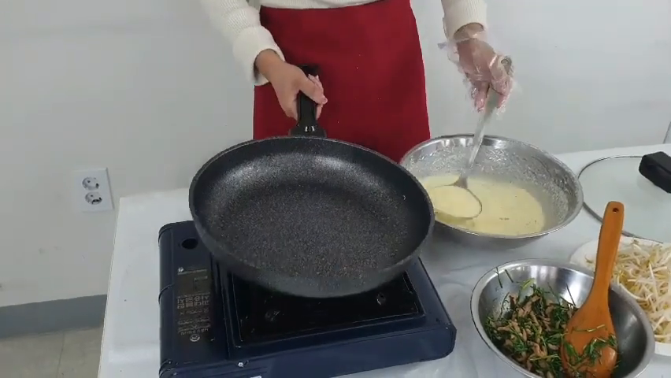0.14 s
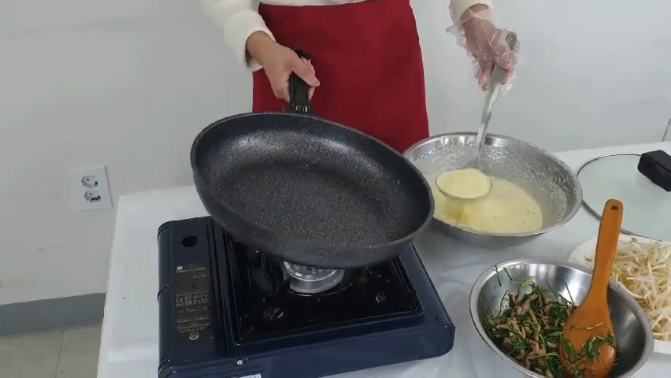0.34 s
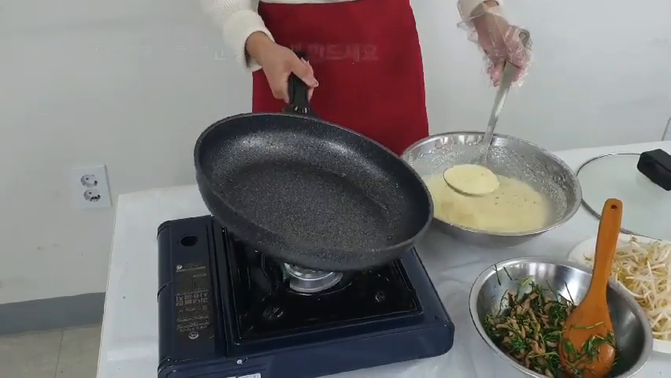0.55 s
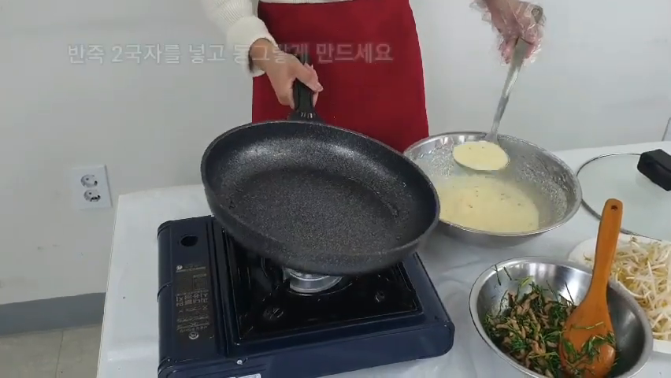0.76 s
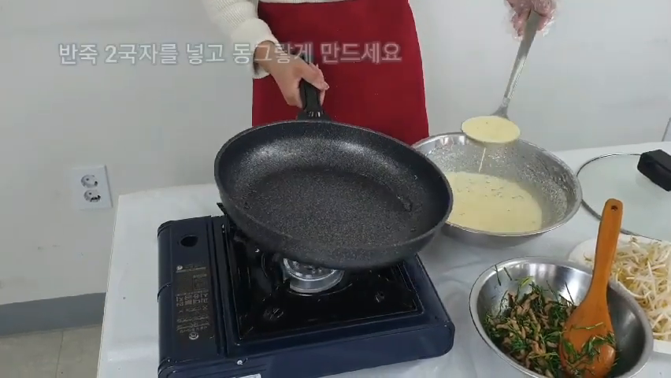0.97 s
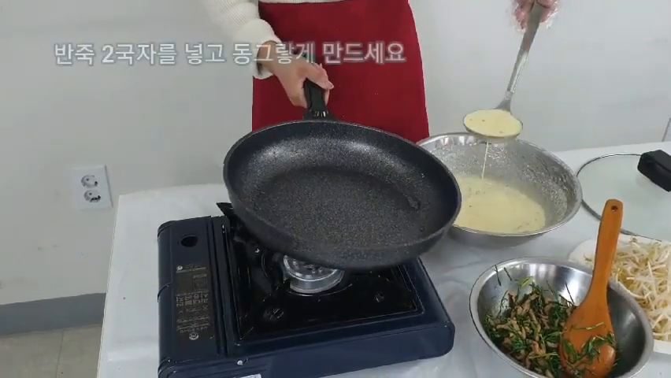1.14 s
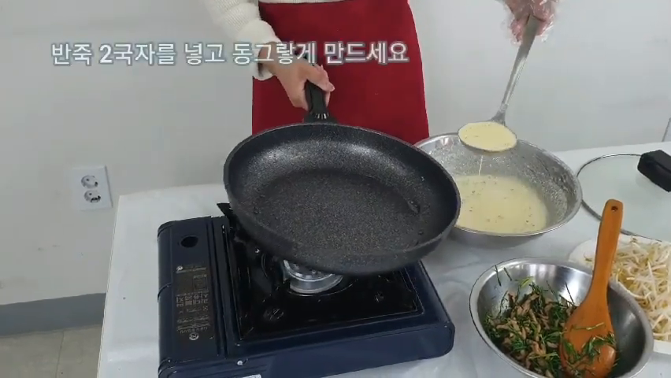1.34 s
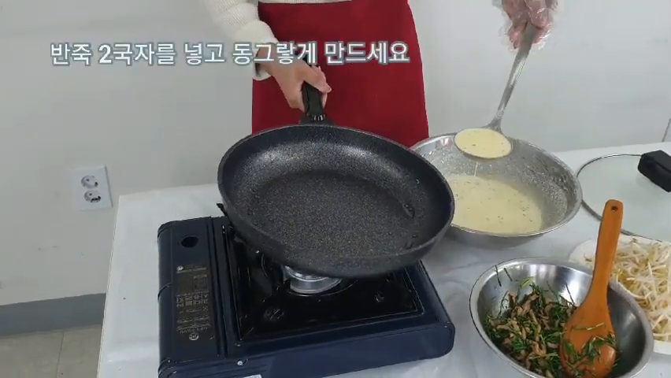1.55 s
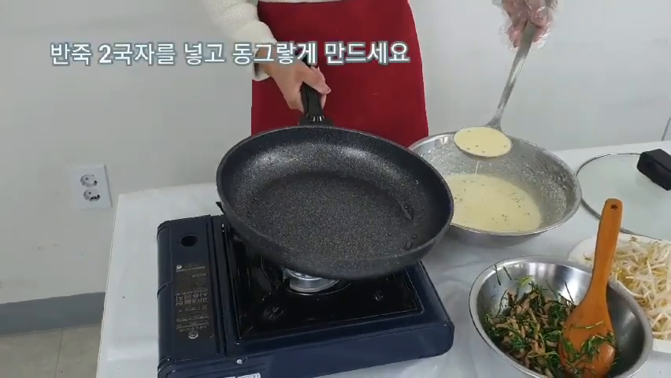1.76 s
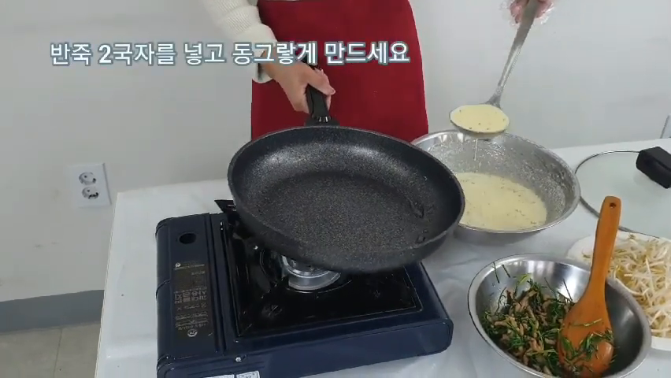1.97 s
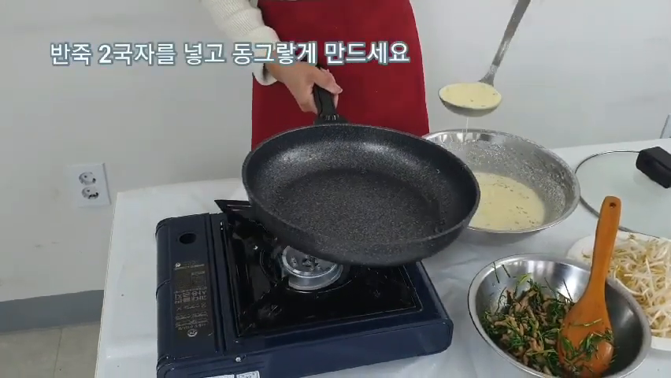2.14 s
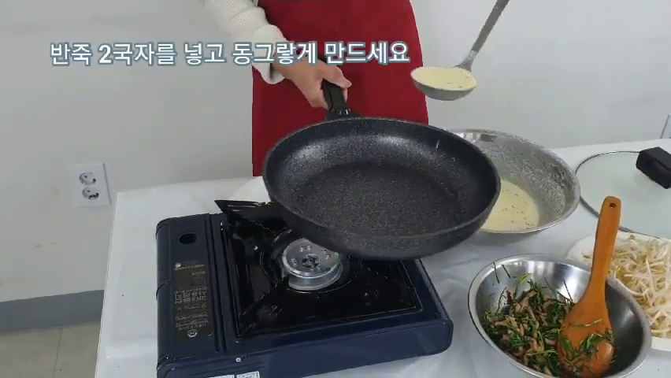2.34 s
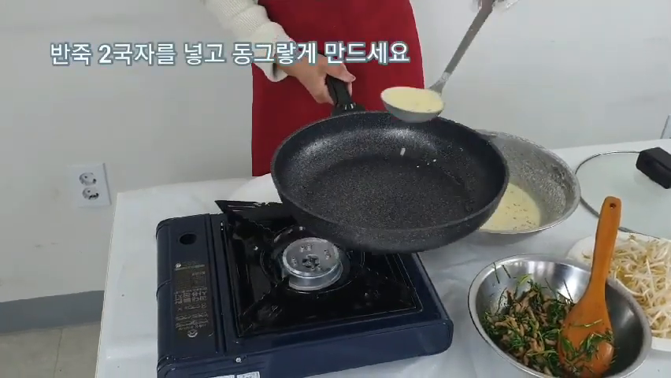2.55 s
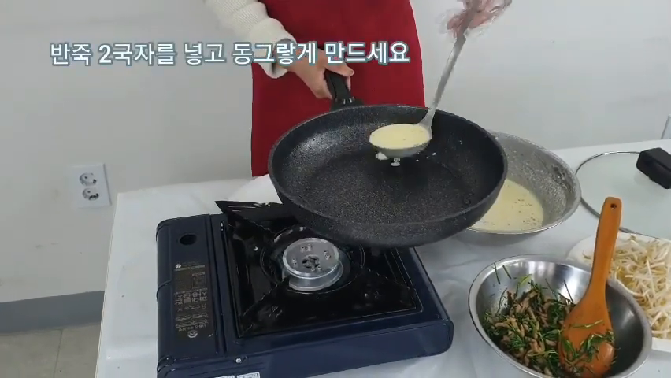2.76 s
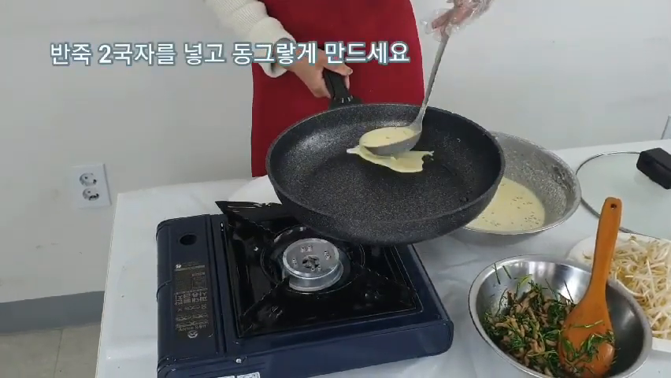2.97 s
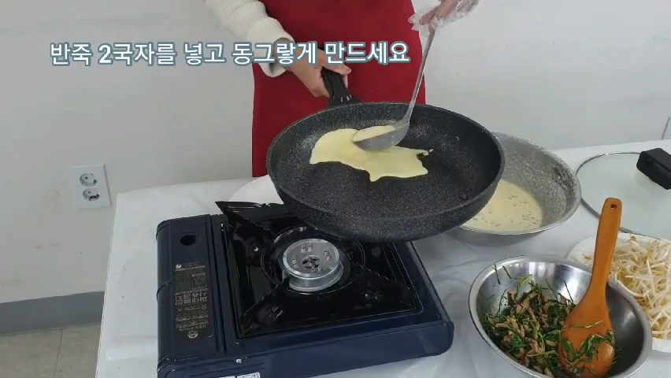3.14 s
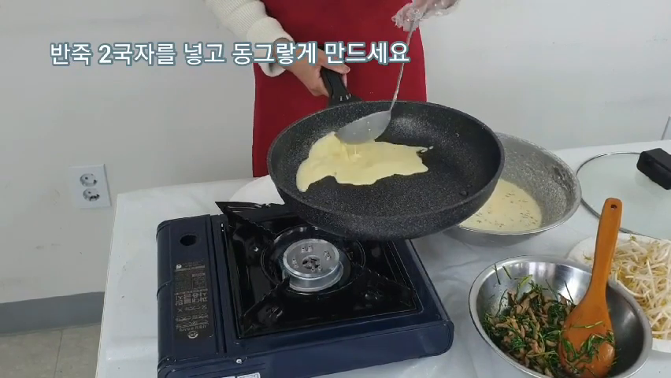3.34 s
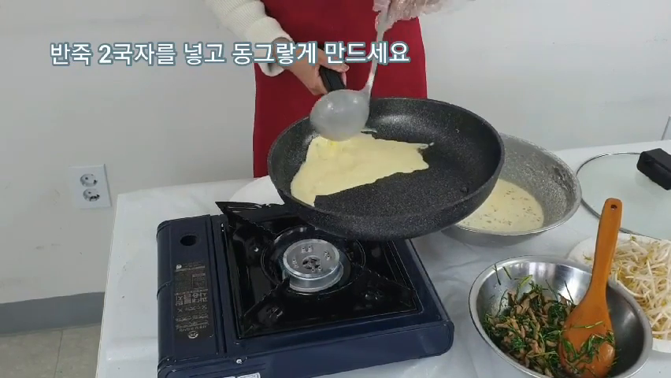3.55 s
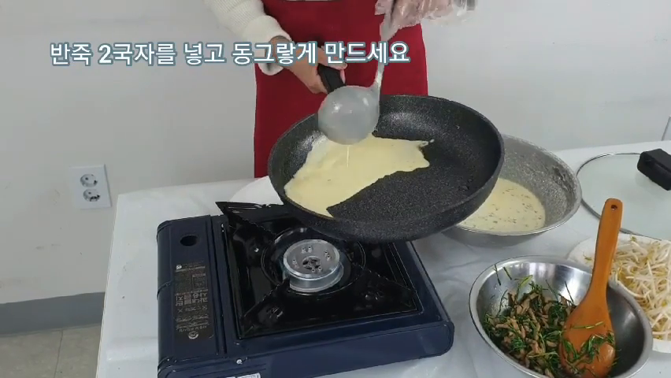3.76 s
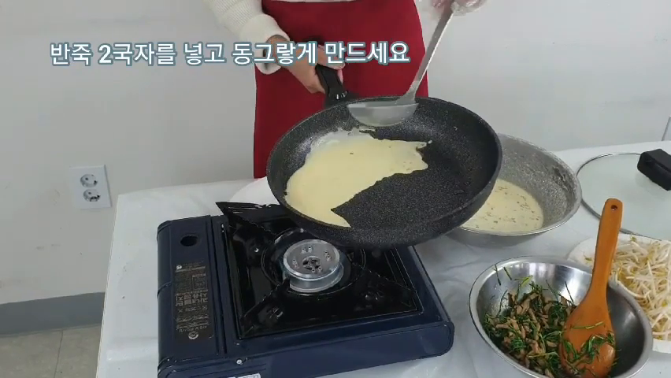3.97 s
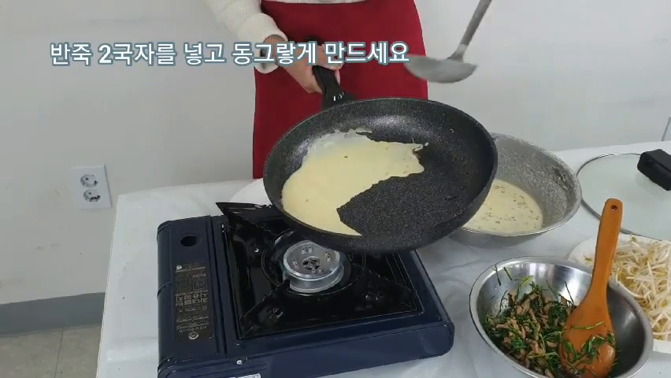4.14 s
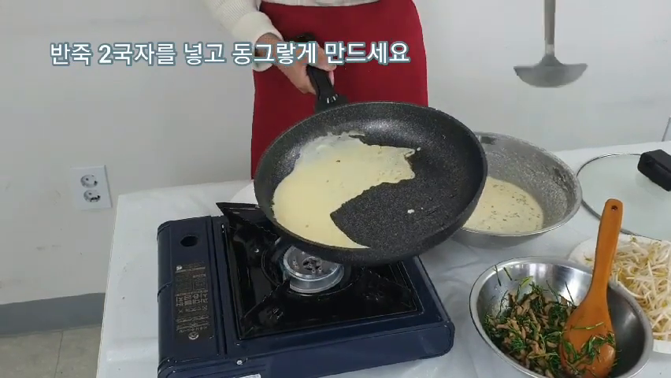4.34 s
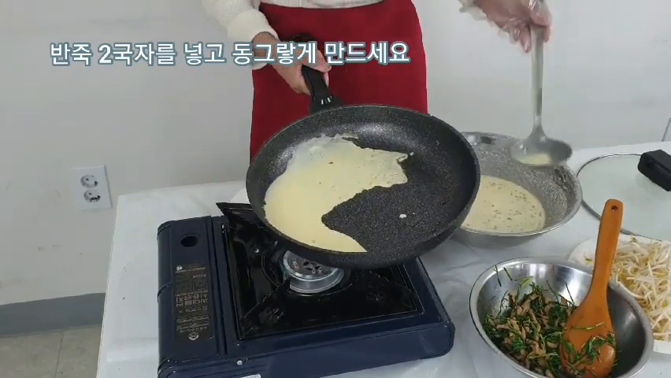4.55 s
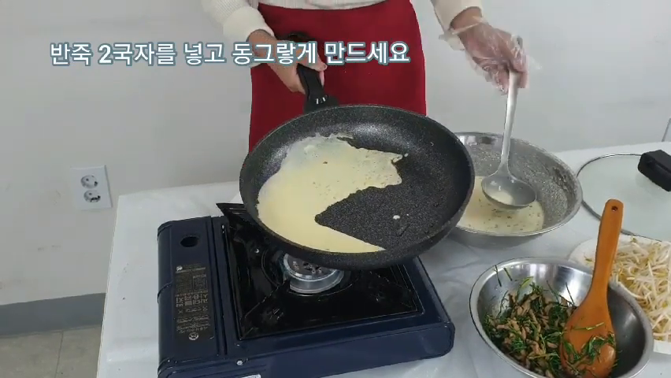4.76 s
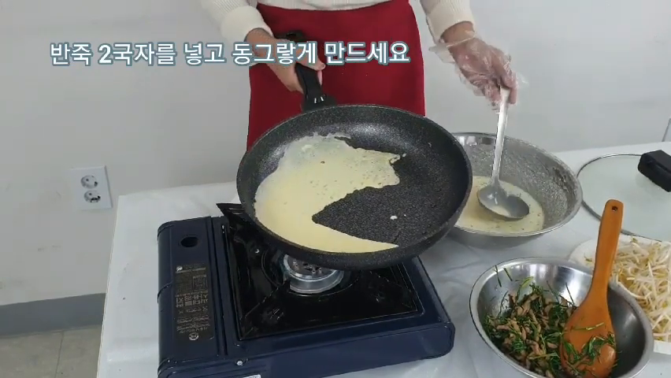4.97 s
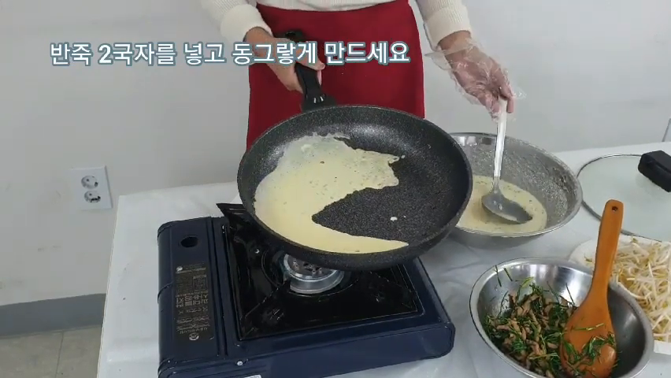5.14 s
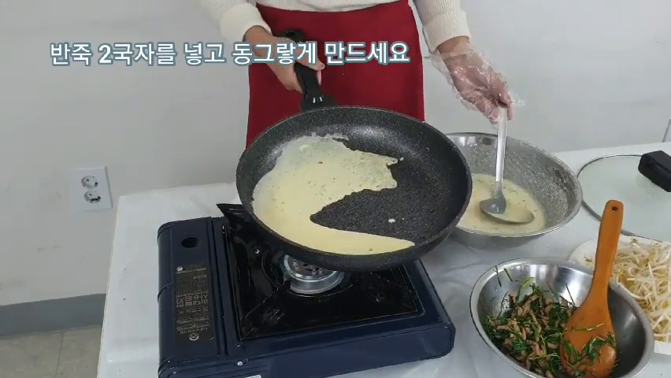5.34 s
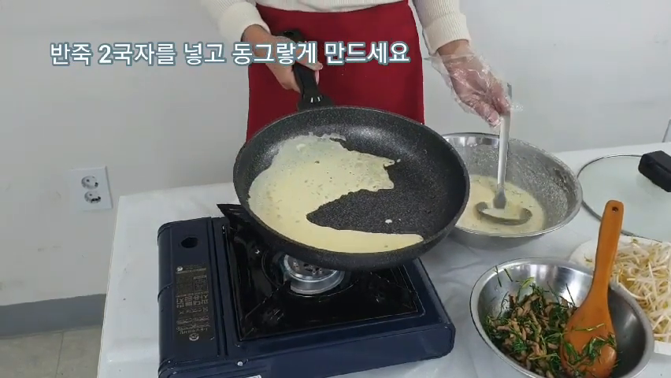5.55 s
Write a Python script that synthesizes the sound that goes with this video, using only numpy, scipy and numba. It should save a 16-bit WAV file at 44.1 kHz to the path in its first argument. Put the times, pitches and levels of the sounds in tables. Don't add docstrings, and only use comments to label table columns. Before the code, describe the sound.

A low motor hum, drops and a thin trickle into a steel bowl, dull table bumps, then batter sizzling in a hot pan and a final ladle knock.

```python
import sys
import numpy as np
from scipy import signal
from scipy.io import wavfile
from scipy.ndimage import uniform_filter1d
from numba import njit

SR = 44100
rng = np.random.default_rng(int(sys.argv[2]) if len(sys.argv) > 2 else 0)


def to_wav(sig):
    pcm = np.clip(np.atleast_2d(sig), -1, 1) * 32767
    pcm = np.round(pcm).astype(np.int16)
    wavfile.write(sys.argv[1], SR, pcm.T)


def volts_from_db(level):
    exponent = np.asarray(level, float) / 20
    return 10 ** exponent


N = 246903

# (time [s], level [dB])
HUM = [(0.0, -42.5), (0.73, -43), (0.84, -49), (0.92, -42.5), (2.03, -43.5), (2.09, -38.5), (2.35, -47.5),
       (2.4, -40.5), (2.79, -46), (3.04, -37), (3.16, -41.5), (3.34, -40.5), (4.66, -42.5), (4.73, -43.5),
       (5.57, -42), (5.6, -51)]
MOTOR_HZ = 59.03
LINES_DB = (-4.5, -2)
WAVER_DB, WAVER_RATE, THIRD_DB = 1.5, 9.6, -20.5
# (pitch [Hz], density [dB per Hz])
AIR = [(20, -9), (35, -24), (50, -6.5), (70, -13), (95, -8.5), (150, -14.5), (200, -13), (360, -20.5),
       (450, -18), (520, -22), (720, -26), (1400, -30), (3500, -35.5), (15500, -39.5)]
AIR_DB, AIR_FOLLOWS = -50, 0.69
# (time [s], lift [dB])
AIR_STIRS = [
    (0.0, 5),
    (2.15, 0.35),
    (2.75, 3.6),
    (3.85, 6.2),
    (4.15, 5.1),
    (4.5, 4.3),
    (5.3, 1.5),
]
AIR_STIR_S = 0.13
# (time [s], lift [dB])
TREBLE_STIRS = [
    (0.25, -1.5),
    (0.75, -0.5),
    (2.25, -3.5),
]
TREBLE_STIR_S = 0.2
# (pitch [Hz], likeness [0-1])
LIKENESS = [(40, 0.8), (130, 1), (290, 0.85), (640, 0.62), (1400, 0.45), (3100, 0.27), (6800, 0.0),
            (11000, 0.0), (15000, 0.4)]
# (pitch [Hz], likeness [0-1])
HISS_ALIKE = [(9000, 0.02), (11500, 0), (13000, 0.3), (15500, 0.6)]
# (time [s], peak [dB], centre [Hz], fade [s], left minus right [dB])
RUSTLES = [
    (0, -47.5, 2450, 0.29, 0),
    (0.171, -51, 1400, 0.32, 1),
    (0.529, -50, 1800, 1, 0),
    (0.541, -54, 8000, 0.87, 1),
    (2.076, -38.5, 170, 0.37, 1),
    (2.171, -48, 170, 0.22, -2),
    (2.601, -47.5, 1170, 0.81, 0),
    (5.249, -34.5, 453, 0.53, 0),
]
# (time [s], level [dB])
FADING = [
    (0.018, -43),
]
# (pitch [Hz], width [Hz], level [dB])
KNOCK_MODES = [(249, 25, -4.0), (355, 38, -11), (480, 49, -27), (786, 330, -24.5)]
# (time [s], peak [dB], pitch [Hz], left minus right [dB])
DROPS = [(0.056, -46, 1490, 1), (0.3304, -46, 3020, -4), (0.408, -56, 3140, -7), (0.3994, -60, 1380, -7),
         (1.066, -45, 3600, -3), (1.108, -46, 1630, -7), (1.1287, -44.5, 3370, 3), (1.169, -45, 1720, 2),
         (1.172, -44, 3000, 2), (1.1986, -53, 2800, 3), (1.22, -52, 2800, 2), (1.2396, -42, 2170, 5),
         (1.3144, -40, 2080, -4), (1.352, -37.5, 1700, -2), (1.35, -48, 2750, 0), (1.45, -48, 1950, 0),
         (1.567, -41, 1780, -2), (1.565, -42, 2400, -2), (1.605, -42, 2450, 0.0), (1.611, -47, 3000, 3),
         (1.635, -42, 2340, -1), (1.655, -47, 1650, -2), (1.671, -51, 2480, -1), (1.769, -42, 2520, -5),
         (1.765, -44, 1700, -2), (1.809, -44, 1710, 1), (2.707, -34, 4600, 0), (2.757, -57, 2420, 0.0),
         (2.797, -48, 2450, 7), (2.9594, -40, 2090, 4), (2.998, -25, 4600, 4), (3.0196, -22, 2360, 0),
         (3.0502, -30, 2300, 8)]
DROP_RING_S, PAN_RING_S, POUR_S = 0.19, 0.084, 2.9
# (time [s], peak [dB], pitch [Hz], left minus right [dB])
SPITS = [(1.066, -43, 12500, -8), (1.2305, -37, 5130, -2), (1.277, -41, 9230, -11), (1.3585, -37, 6260, -6),
         (1.429, -42, 7000, -11), (1.66, -38, 13700, -5), (2.5147, -57, 6330, -30), (2.84, -36.5, 7670, -8),
         (3.0524, -51, 7520, -0.5), (3.4614, -24, 11000, -12), (5.2399, -32, 7520, 0),
         (4.571, -26, 12400, -11), (5.429, -27, 14400, -1)]
SPIT_S, PAN_SPIT_S = 0.0094, 0.0049
# (time [s], level [dB])
TRICKLE = [
    (1.066, -57),
    (1.16, -63),
    (1.231, -51.5),
    (1.277, -55.5),
    (1.35, -52),
    (1.43, -55.5),
    (1.57, -55),
    (1.6, -52.5),
    (1.659, -53.5),
    (1.77, -55.5),
]
SPURT_RISE = 4000
SPURT_FALL = (91, 64, 46.7, 51.4)
TRICKLE_SIZES_DB = (-1.3, 1, -0.79, -1)
TRICKLE_LARGEST_HZ = 250
SIZE_HZ = (10000, 4400, 1800, 800)
# (pitch [Hz], level [dB])
BUBBLES = [(300, -4.5), (600, -2.5), (1100, -3), (2000, 0.5), (3000, -1), (4500, -2), (7000, 0.5),
           (10000, -1), (13000, 1.5), (15500, 3)]
# (time [s], peak [dB])
BOWL_RING = [(1.16, -52), (1.225, -53), (1.247, -48), (1.285, -48), (1.32, -51), (1.347, -37), (1.378, -43),
             (1.41, -49), (1.455, -47), (1.52, -53), (1.56, -54)]
BOWL_RISE, BOWL_FALL = 1600, 260
# (pitch [Hz], width [Hz], level [dB])
BOWL_MODES = [(1048, 38, 2), (926, 66, -7), (1720, 100, -13)]
# (time [s], peak [dB], pitch [Hz], ring [s])
BUMPS = [
    (2.082, -22.5, 76.4, 0.21),
    (2.138, -30, 81.5, .1),
    (2.173, -27, 91.5, 0.079),
    (2.206, -19, 68, 0.048),
]
# (time [s], level [dB], largest bubbles [octaves under LARGEST_TOP_HZ],
# coarseness [dB per octave down])
SIZZLE = [(2.4, -78, .4, -2), (2.52, -53.5, 0.36, -1), (2.64, -51.5, 0.33, -2), (2.66, -43, 0.11, -1.5),
          (2.74, -44, 2.6, -2), (2.83, -47.5, 0.54, -0.5), (2.85, -38.5, 0.48, -0.6),
          (2.92, -34, 1.08, 0.7), (3.04, -34.5, 1.45, 1.9), (3.21, -36, 2.12, 0.5),
          (3.31, -34.5, 2.3, -0.3), (3.47, -35, 2.1, -0.1), (3.55, -37.5, 2.18, 0.54),
          (3.9, -37.5, 2.43, -0.23), (4.15, -39, 2.26, 0.23), (4.6, -41.5, 2.82, 0.62),
          (5.02, -42, 3.38, 0.67), (5.6, -45.5, 3.6, 1.04)]
LARGEST_TOP_HZ = 4000
FRY_SIZES_DB = (-1, -1.5, -4.5, -7.5)
LEAK_DB = -20.5
# (time [s], lift [dB])
FLARES = [(2.71, 3), (3.17, 0.5), (3.3, 2.5), (3.4, 0.5), (3.85, 3), (4.21, 3.5), (4.33, 1), (4.57, 1.5),
          (5.05, 3), (5.2, 4), (5.432, 3.5), (5.575, 7.5)]
FLARE_HZ, FLARE_S = 3000, 0.02
SPATTER_RATE, SPATTER_DB, SPATTER_HZ = 260, 11, 12500
CRACKLE_RATE, CRACKLE_DB, CRACKLE_HZ = 110, 9, 5500
# (start [s], end [s], first pitch [Hz], last pitch [Hz], level [dB])
WHISTLE = [
    (2.7, 2.743, 1660, 1660, -53),
    (2.748, 2.805, 1665, 1750, -58),
    (2.705, 2.727, 2450, 2450, -59),
    (2.75, 2.84, 2470, 2475, -51.5),
    (2.873, 2.954, 2300, 2340, -48),
    (2.9, 2.95, 1575, 1570, -46),
]
# (time [s], peak [dB])
PAN_HUM = [
    (3.134, -57),
    (3.272, -50),
    (3.4, -54),
    (3.602, -51),
    (3.758, -53),
    (3.9, -50),
]
PAN_HZ = 424
# (time [s], peak [dB], pitch [Hz], ring [s])
LADLE_NOTES = [
    (8.1, -38, 830, .08),
    (4.4, -34, 640, .1),
    (5.565, -29, 531, 0.32),
    (5.572, -36.5, 173, .5),
    (4.2, -38, 1590, .15),
]
# (time [s], level [dB])
STIR = [
    (5.39, -44),
    (5.44, -45),
    (5.49, -47),
]
# (start, end [s])
STIR_HZ = (203, 293)
STIR_CLIMB_S = (5.455, 5.5)
# (time [s], level [dB])
LADLE = [
    (5.561, -33),
    (5.574, -30),
    (5.583, -36),
    (5.594, -35),
]
# (pitch [Hz], width [Hz], level [dB])
LADLE_MODES = [(188, 93, -9), (402, 66, -11.5), (600, 100, -12.5), (750, 270, -14.5), (1270, 100, -20),
               (1600, 210, -17.5), (2170, 300, -31)]
ROOM_T60_S, ROOM_DAMP, ROOM_DB = .35, .3, -13
PATCH_DB, PATCH_HZ, PATCH_S = 1.8, 180, 0.05
HOLE_DB, HOLE_FROM, PATCH_FULL_HZ = 16, 1.35, 2000
TOP_HZ = 15500


def curve(table):
    s, first, *rest = np.transpose(table)
    t = np.arange(N) / SR
    return [np.interp(t, s, first, left=-120, right=-120)] + [np.interp(t, s, c) for c in rest]


def across(table, hz):
    points = np.array(table)
    return np.interp(np.log(hz), np.log(points[:, 0]), points[:, 1])


def unit(x):
    return x / np.sqrt(np.mean(x ** 2))


def lean(db):
    return volts_from_db(np.array([[db], [-db]]) / 2)


@njit
def svf(x, hz, width):
    y, b, l = np.empty(len(x)), 0., 0.
    turn = 2 * np.pi * hz / SR
    g, k = np.tan(turn / 2), width / hz * turn / np.sin(turn)
    for i in range(len(x)):
        v = (b + g * (x[i] - l)) / (1 + g * (g + k))
        b, l, y[i] = 2 * v - b, l + 2 * g * v, k * v
    return y


def walk(rate):
    k = int(SR / rate)
    held = np.repeat(rng.standard_normal(N // 200 + 1), k)[:N]
    return 1.17 * uniform_filter1d(uniform_filter1d(held, k), k)


def noise():
    return rng.standard_normal(N)


def pair(source, hz, width, alike=None):
    alike = np.clip(across(alike or LIKENESS, hz), 0, .99)
    mid, side = (unit(svf(svf(source(), hz, width), hz, width)) for _ in range(2))
    return np.sqrt((1 + alike) / 2) * mid + np.sqrt((1 - alike) / 2) * side * np.array([[1], [-1]])


def ringing(modes):
    return unit(sum(volts_from_db(db) * np.sqrt(w) * pair(noise, 1. * f, 1.45 * w) for f, w, db in modes))


def swells(rows, rise, fall):
    t, power = np.arange(N) / SR, 0
    for s, db in rows:
        below = np.maximum(abs(rise) * (s - t), abs(fall) * (t - s))
        power = power + volts_from_db(np.maximum(db - below, -140)) ** 2
    return np.sqrt(power)


def humps(rows, width_s):
    t = np.arange(N) / SR
    return sum(db * np.exp(-((t - s) / width_s) ** 2) for s, db in rows)


def ping(s, db, hz, ring_s, pan_db, rough=0., rise_s=.001):
    out, first = np.zeros((2, N)), int(s * SR)
    t = np.arange(min(SR // 2, N - first)) / SR
    body = np.sin(2 * np.pi * hz * t)
    if rough:
        chance = rng.standard_normal((2, SR // 2))[:, :len(t)]
        puff = [svf(svf(c, 1. * hz, rough * hz), 1. * hz, rough * hz) for c in chance]
        body = 0.53 * unit(np.array(puff))
    out[:, first:first + len(t)] = np.clip(t / rise_s, 0, 1) * volts_from_db(-60 * t / ring_s) * body
    return volts_from_db(db) * lean(pan_db) * out


def fridge_motor():
    motor_db, = curve(HUM)
    first_db, second_db = (motor_db + db + WAVER_DB * walk(WAVER_RATE) for db in LINES_DB)
    third_db = second_db + THIRD_DB + 9.0 * walk(4.27)
    turn = 2 * np.pi * MOTOR_HZ * np.arange(N) / SR
    hum = volts_from_db(first_db) * lean(-1.6) * np.sin(turn)
    hum = hum + volts_from_db(second_db) * np.sin(2 * turn + 1.0 + 0.7 * walk(2.55))
    hum = hum + volts_from_db(third_db) * np.sin(3 * turn + 0.3 * walk(3.9))
    return np.sqrt(2) * hum


def room_air():
    motor_db, = curve(HUM)
    air_db = AIR_DB + AIR_FOLLOWS * (uniform_filter1d(motor_db, SR // 2) - motor_db.mean())
    air_db = air_db + humps(AIR_STIRS, AIR_STIR_S)
    air, treble_db = 0, humps(TREBLE_STIRS, TREBLE_STIR_S)
    for f in 20 * 2 ** np.arange(0, 9.7, 1 / 3):
        share = np.clip(1.2 - f / 3000, .2, 1)
        level_db = across(AIR, f) + air_db * share - 56 * (1 - share)
        level_db = level_db + treble_db / (1 + (2500 / f) ** 2) + 1.0 * walk(11.0)
        air = air + volts_from_db(level_db) * np.sqrt(f) * pair(noise, f, f / 3, LIKENESS if f < 9000 else HISS_ALIKE)
    return volts_from_db(-18.5) * lean(-2.2) * air


def rustles():
    return sum(ping(*row, rough=0.76, rise_s=0.015) for row in RUSTLES)


def fading_knock():
    return swells(FADING, 50, 165) * ringing(KNOCK_MODES)


def drops():
    out = 0
    for s, db, hz, pan in DROPS:
        ring_s = DROP_RING_S if s < POUR_S else PAN_RING_S
        out = out + ping(s, db, hz, ring_s, pan, rough=0.11, rise_s=0.0028)
    return out


def spits():
    out = 0
    for s, db, hz, pan in SPITS:
        ring_s = SPIT_S if s < POUR_S else PAN_SPIT_S
        out = out + ping(s, db + 6, hz, ring_s, pan, rough=0.43, rise_s=.0001)
    return out


def bubble_loudness():
    spurts = zip(TRICKLE_SIZES_DB, SPURT_FALL)
    bowl = np.array([volts_from_db(db) * swells(TRICKLE, SPURT_RISE, fall) for db, fall in spurts])
    pan_db, octaves, coarse = curve(SIZZLE)
    flare_db = humps(FLARES, FLARE_S)

    def loudness(hz, at):
        place = np.interp(-np.log(hz), -np.log(SIZE_HZ), np.arange(4))
        k = np.minimum(place.astype(int), 2)
        trickle = bowl[k, at] ** (k + 1 - place) * bowl[k + 1, at] ** (place - k)
        trickle = trickle / np.sqrt(1 + (TRICKLE_LARGEST_HZ / hz) ** 8)
        above = np.log2(hz / LARGEST_TOP_HZ) + octaves[at]
        tilt_db = coarse[at] * np.log2(SIZE_HZ[0] / hz) + flare_db[at] / (1 + (FLARE_HZ / hz) ** 2)
        fry = volts_from_db(pan_db[at] + np.interp(place, np.arange(4), FRY_SIZES_DB) + tilt_db)
        fry = fry * (volts_from_db(LEAK_DB) + 1 / np.sqrt(1 + 2 ** (-8.0 * above)))
        return (fry + trickle) * volts_from_db(across(BUBBLES, hz))
    return loudness


def bursts(rate, spread_db, most_db):
    chance = rng.random((3, N))
    size = volts_from_db(np.minimum(-spread_db * np.log(1 - chance[2]), most_db))
    return (chance[0] < rate / SR) * np.sign(chance[1] - .5) * size


@njit
def grains(start, hz, ring_s, size, ear):
    out = np.zeros((2, N))
    for j in range(len(start)):
        fade = 7 / (ring_s[j] * SR)
        for i in range(min(int(ring_s[j] * SR), N - start[j])):
            shape = size[j] * fade * i * np.exp(1 - fade * i)
            out[0, start[j] + i] += shape * np.sin(2 * np.pi * hz[j] * i / SR)
            out[1, start[j] + i] += shape * np.sin(2 * np.pi * hz[j] * i / SR + ear[j])
    return out


def batter_bubbles():
    loudness = bubble_loudness()
    seethe_db, out = .5 * walk(14) + 0.61 * walk(90), 0
    for hz in 300 * 2 ** np.arange(0, 5.8, 1 / 3):
        swarm = pair(lambda: bursts(14000, 3.0, 24), hz, hz / 3)
        out = out + loudness(hz, np.arange(N)) * volts_from_db(-5.0 + seethe_db + 0.55 * walk(19)) * swarm
    when, pitch, size, side = rng.random((8000, 4)).T
    start, hz = (when * N).astype(np.int64), 700 * 20 ** pitch
    size = loudness(hz, start) * volts_from_db(-12 + 6.55 * size)
    vents = grains(start, hz, 0.033 * (0.9 + side), size, (side - .5) * np.clip(hz / 700, 0, 6))
    return lean(-.8) * (out + vents)


def bowl_ring():
    return swells(BOWL_RING, BOWL_RISE, BOWL_FALL) * ringing(BOWL_MODES)


def table_bumps():
    return sum(ping(s, db, hz, ring, -3.3, rise_s=0.017) for s, db, hz, ring in BUMPS)


def spatter(rate, db, hz, width_hz):
    pops = bursts(rate, 0.0, 18) * volts_from_db(curve(SIZZLE)[0] + db)
    side = rng.random(N)
    return np.array([svf(ear, 1. * hz, width_hz) for ear in pops * np.sqrt([side, 1 - side])])


def whistles():
    t, out = np.arange(N) / SR, 0
    for start, end, first_hz, last_hz, db in WHISTLE:
        hz = np.interp(t, (start, end), (first_hz, last_hz)) + 14 * walk(60)
        gate = np.clip(np.minimum(t - start, end - t) / 0.012 + .5, 0, 1)
        out = out + gate * volts_from_db(db + 3.1 * walk(45)) * np.sin(2 * np.pi * np.cumsum(hz) / SR)
    return out


def pan_hum():
    return swells(PAN_HUM, 220, 93) * ringing([(PAN_HZ, 24, 0)]) * volts_from_db(-1 + 2.0 * walk(5.93))


def ladle_notes():
    return sum(ping(s, db, hz, ring, -1.5, rise_s=0.0093) for s, db, hz, ring in LADLE_NOTES)


def ladle_stir():
    hz = np.interp(np.arange(N) / SR, STIR_CLIMB_S, STIR_HZ) + 7 * walk(60)
    hollow = np.sin(2 * np.pi * np.cumsum(hz) / SR) * volts_from_db(3 * walk(40))
    return swells(STIR, 600, 110) * lean(-2.4) * hollow


def ladle_drag():
    return swells(LADLE, 3000, 160) * volts_from_db(1.3 * walk(140)) * ringing(LADLE_MODES)


@njit
def walls(x, lags, gain, damp):
    line, soft, out = np.zeros((8, 4096)), np.zeros(8), np.zeros((2, len(x)))
    for i in range(len(x)):
        total = 0.
        for k in range(8):
            soft[k] += (1 - damp) * (gain[k] * line[k, (i - lags[k]) & 4095] - soft[k])
            total += soft[k]
            out[k % 2, i] += soft[k]
        for k in range(8):
            line[k, i & 4095] = x[i] + soft[k] - total / 4
    return out


def tiles(clicks):
    lags = rng.integers(500, 2200, 8)
    return volts_from_db(ROOM_DB) * walls(clicks.mean(axis=0), lags, volts_from_db(-60 * lags / SR / ROOM_T60_S), ROOM_DAMP)


def patchy(x):
    hz, _, z = signal.stft(x, SR, nperseg=1024)
    field = rng.standard_normal(z.shape[1:])
    field = uniform_filter1d(field, int(PATCH_HZ * 1024 / SR), axis=0)
    field = unit(uniform_filter1d(field, int(PATCH_S * SR / 512), axis=1))
    patch_db = PATCH_DB * field - HOLE_DB * np.maximum(-field - HOLE_FROM, 0)
    gain = volts_from_db(patch_db * np.minimum(hz[:, None] / PATCH_FULL_HZ, 1) ** 2)
    return signal.istft(z * gain, nperseg=1024)[1][:, :N]


def scene():
    clicks = drops() + spits()
    clicks = clicks + spatter(SPATTER_RATE, SPATTER_DB, SPATTER_HZ, 9000.0)
    clicks = clicks + spatter(CRACKLE_RATE, CRACKLE_DB, CRACKLE_HZ, 5000.0)
    steel = fading_knock() + bowl_ring() + pan_hum() + ladle_stir() + ladle_drag()
    kitchen = fridge_motor() + room_air()
    bumps = rustles() + table_bumps() + ladle_notes()
    return clicks + steel + whistles() + patchy(batter_bubbles() + tiles(clicks) + bumps + kitchen)


def top_cut(x):
    return signal.sosfilt(signal.butter(12, 15800, fs=SR, output="sos"), x)


def record(dry):
    low_pass = signal.ellip(10, .2, 70, TOP_HZ, fs=SR, output="sos")
    mix = signal.sosfilt(low_pass, dry)
    return top_cut(mix)


dry = scene()
out = record(dry)
to_wav(out)
```